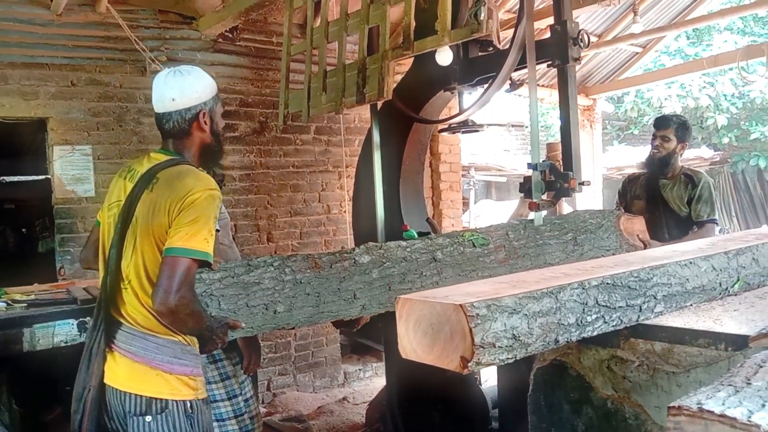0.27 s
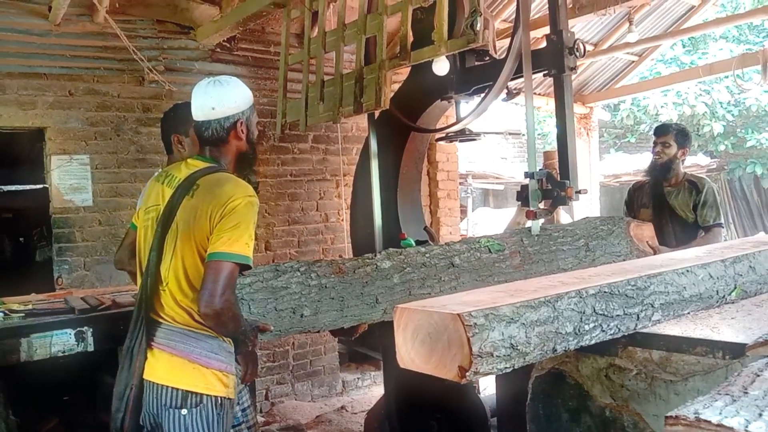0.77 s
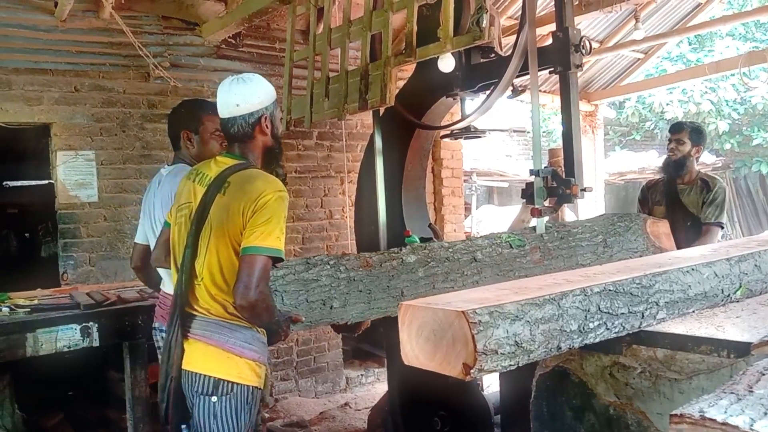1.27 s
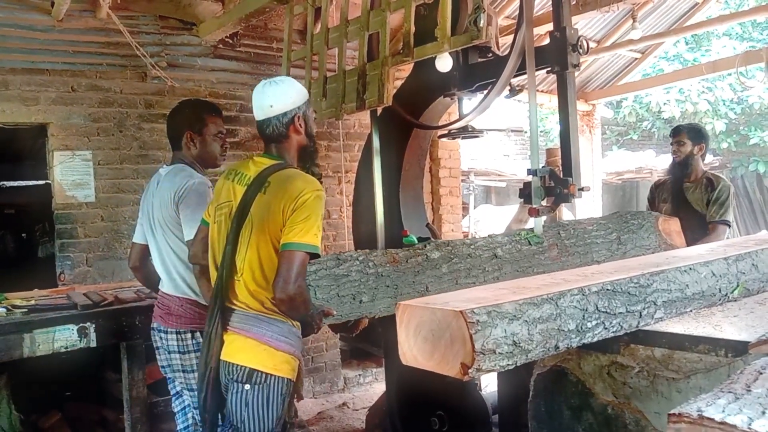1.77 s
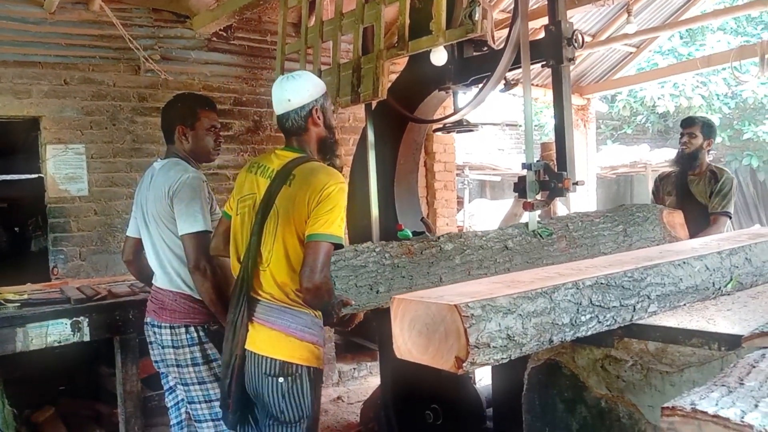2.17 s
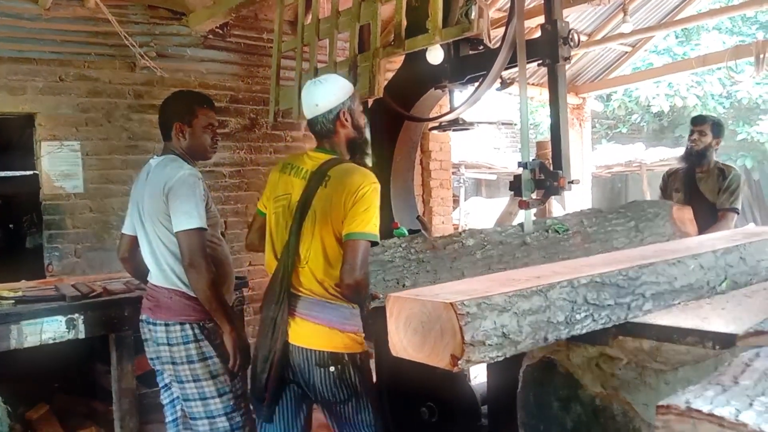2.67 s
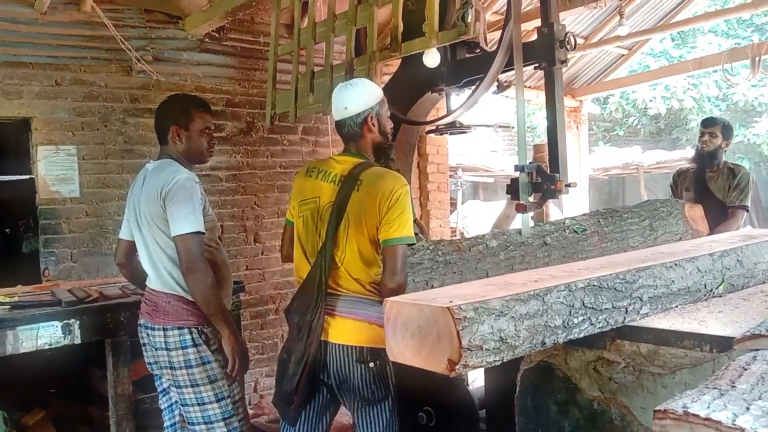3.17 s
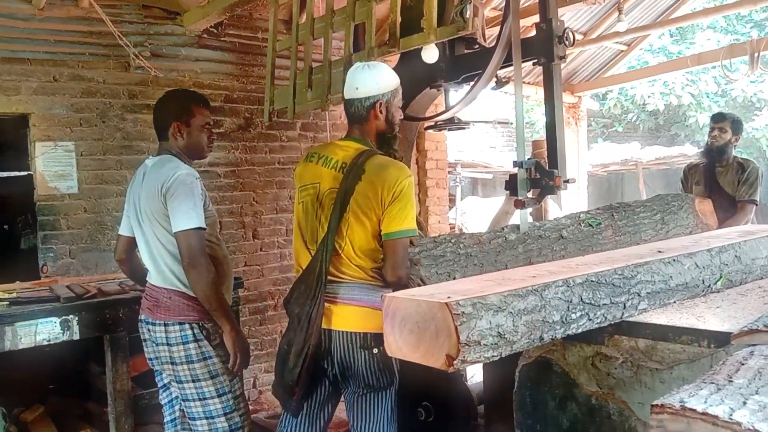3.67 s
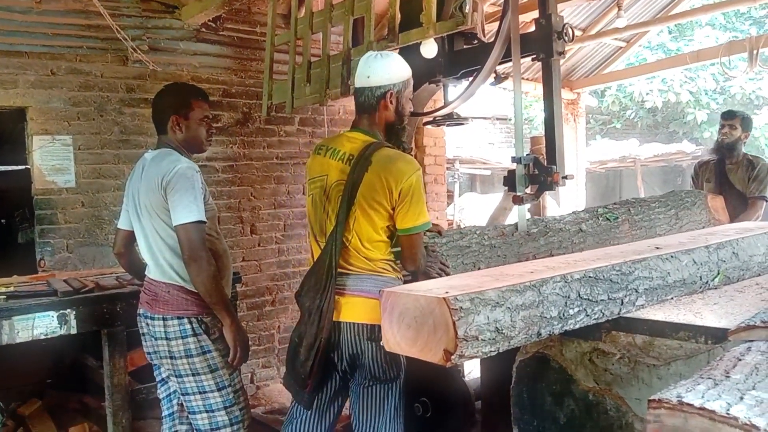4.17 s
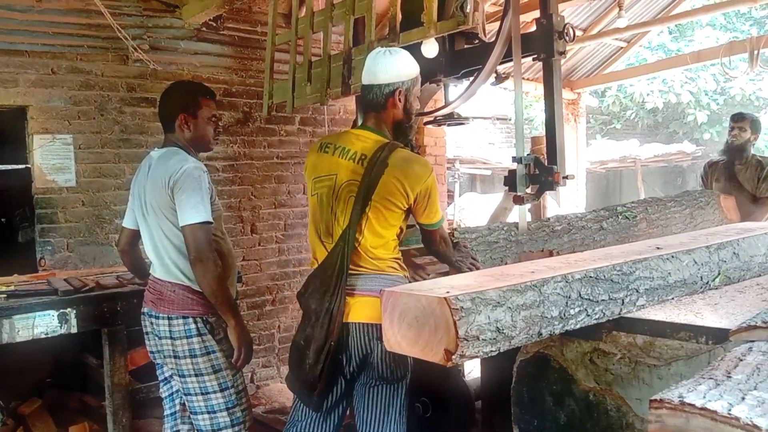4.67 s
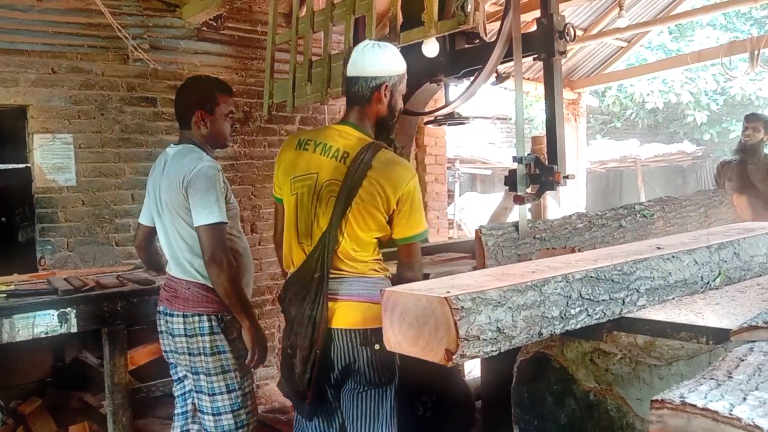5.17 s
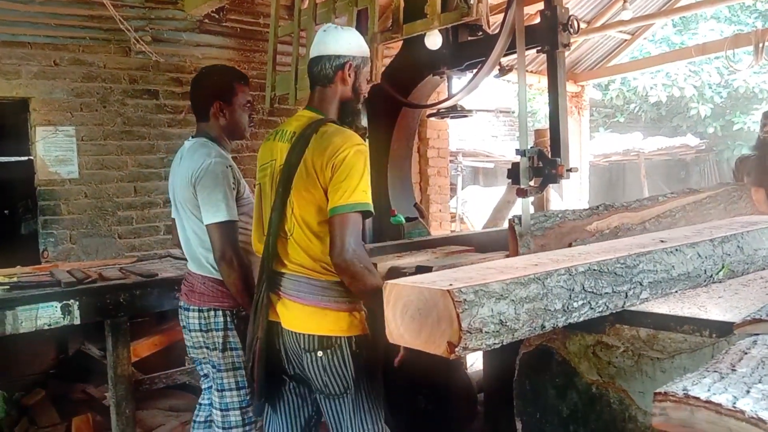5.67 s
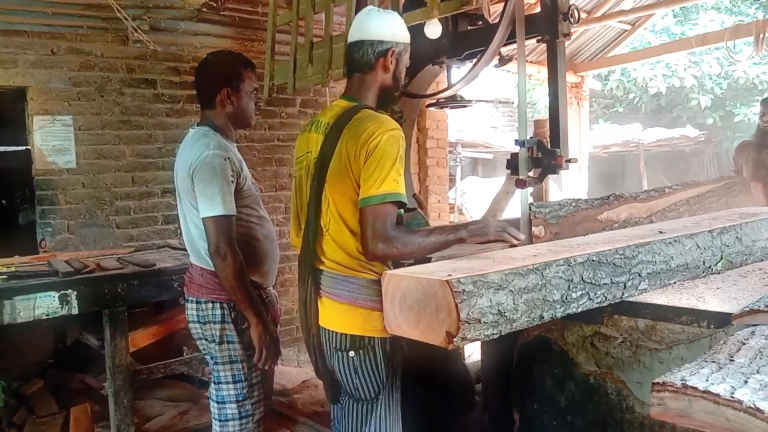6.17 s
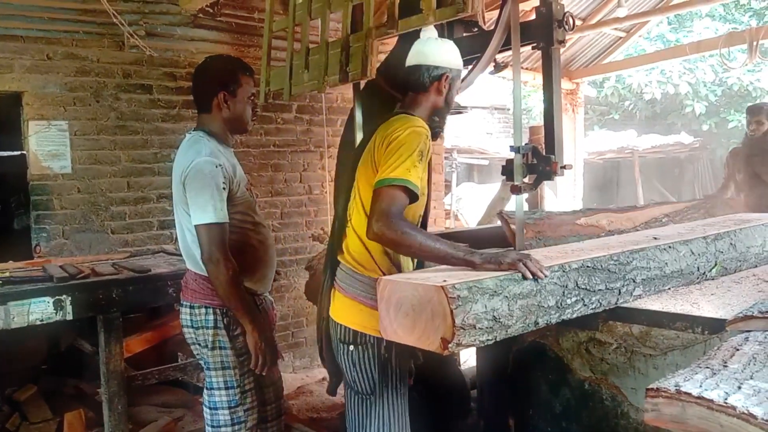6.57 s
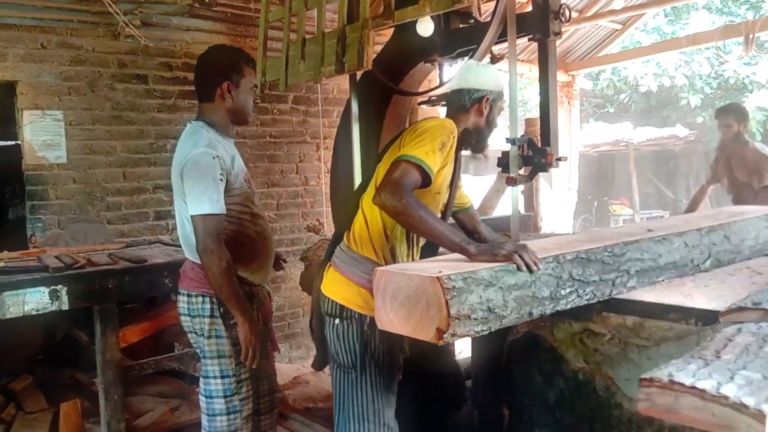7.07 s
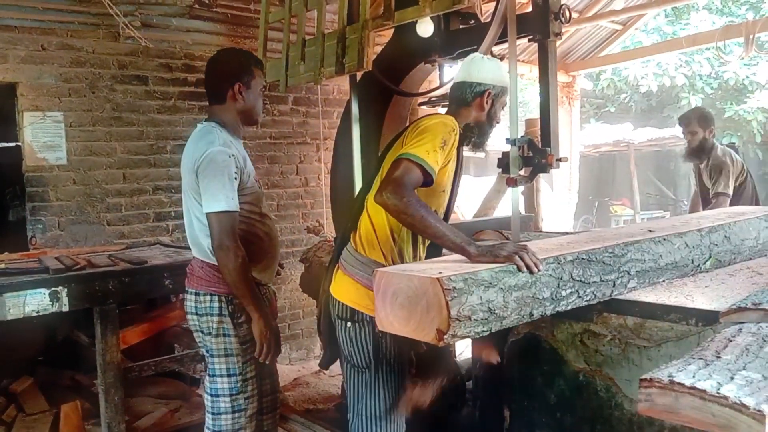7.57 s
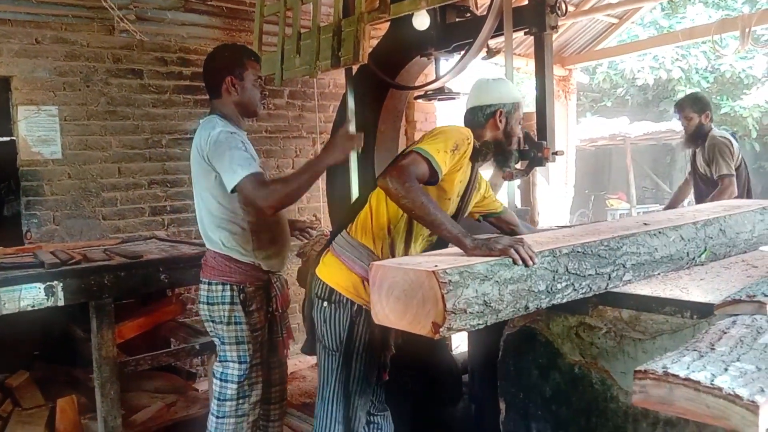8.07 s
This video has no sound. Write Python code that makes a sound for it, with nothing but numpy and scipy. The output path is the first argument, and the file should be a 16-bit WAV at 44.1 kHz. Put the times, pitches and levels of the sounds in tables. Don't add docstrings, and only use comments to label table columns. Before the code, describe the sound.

From the first instant a large band saw is at full noise, ripping a log a few metres from a phone microphone in an open brick shed with a tin roof. The sound is a dense, rough scream, strongest around 2 to 2.5 kHz, with a bright upper ring, gritty iron frame resonance and a wide hiss of sawdust. Beneath it a belt drive hums near 100 Hz and rumbles, wavering with small dips and swells. Soft timber knocks are mostly buried, one clearer at 1.4 s. The drive gradually speeds up from about 3 s. At 5.5 s the blade leaves the wood: chip hiss thins, the freed blade rings brighter, and a faint low slab groan passes until 6.5 s. The saw runs on, its hum surging near 7.5 s. Wood knocks around 7.6 to 7.7 s, then a loud sharp clack at 8.2 s; the noise continues to the end.

```python
import sys
import numpy as np
from scipy import signal
from scipy.fft import rfft, irfft
from scipy.io import wavfile
from scipy.ndimage import uniform_filter1d

SR = 44100
rng = np.random.default_rng(int(sys.argv[2]) if len(sys.argv) > 2 else 0)


def elevation(decibels):
    levels = np.asarray(decibels, float)
    return 10 ** (levels / 20)


def store_wav(level_fs):
    pcm = np.round(np.clip(np.atleast_2d(level_fs), -1, 1) * 32767)
    wavfile.write(sys.argv[1], SR, pcm.T.astype(np.int16))


N = 366471

# middle in seconds, low edge in Hz, high
# edge in Hz, level in dB.
SIDE_BURSTS = [(.995, 8200, 10500, -39), (1.785, 12400, 14600, -42), (2.18, 11670, 13300, -43),
               (3.109, 5200, 7000, -27), (3.967, 12560, 14030, -49), (7.032, 5170, 6400, -27),
               (7.032, 12400, 14100, -48), (7.357, 6220, 7550, -30), (7.357, 11600, 13330, -45)]

# time in seconds, firing rate in Hz.
FIRING_RATE = [(0.0, 97.5), (1.2, 99.4), (1.7, 97.5), (2.7, 100.7), (3.6, 102.3), (4.3, 105.7),
               (5.5, 109.1), (6.6, 111.6), (7.6, 110.6), (8.31, 111.4)]
# multiple of the firing rate, level in dB.
WEAK_ORDERS = [(28.7, -47), (33.2, -56)]
# time in seconds, change in dB, length in seconds.
LOW_SWELLS = [(.3, -1, .08), (0.499, 5, .12), (.65, -9, .08), (.77, 4, .08), (1.0, 4, .06), (1.28, -5, .1),
              (1.44, 3, .07), (1.55, -6, 0.058), (1.94, -9, .07), (2.12, -1, .06), (2.25, -1, .08),
              (2.607, -12, 0.1), (2.971, -12, 0.12), (3.35, 2, 0.063), (3.52, -5, .07), (3.9, -9, 0.13),
              (4.09, 1, 0.047), (4.39, -17, .08), (4.71, -8, .07), (4.96, -5, 0.065), (5.117, -8, .08),
              (5.52, -6, .08), (5.761, -7, .05), (5.9, 7, .07), (6.2, -4, .1), (6.72, -3, 0.11),
              (6.946, -9, .05), (7.11, -7, .06), (2.7, 4, .05), (7.71, -5, .06)]
# pitch in Hz, width in Hz, level in dB.
HOUSING_MODES = [(132, 37, -3), (258, 61, -3.5)]
# pitch in Hz, level in dB.
HOUSING_BED = [(20, -28), (50, -16), (90, -2), (130, 1.5), (280, 0), (350, -6.5), (450, -2.5), (600, -52)]

# start in seconds, peak in dB, pitch in Hz, 60 dB decay in seconds.
TIMBER_KNOCKS = [(1.4, -23, 1280, 0.16), (1.424, -33, 258, .15), (.47, -37, 105, .12), (.99, -35, 120, .12),
                 (2.68, -36, 127.4, 0.14), (3.09, -41, 150.6, .1), (3.37, -33, 387, .1),
                 (4.291, -31, 316, 0.12), (5.892, -30, 333, .2), (6.982, -32, 347.5, 0.11),
                 (7.615, -22, 953, 0.055), (7.729, -18, 1280, 0.096), (7.732, -19, 1090, .05),
                 (7.733, -18, 766, 0.056), (8.217, -5, 2210, .045)]
# time in seconds, pitch in Hz, level in dB.
SLAB_GROAN = [
    (5.55, 243, -65),
    (5.75, 245, -49),
    (6.25, 246, -47),
    (6.5, 240, -60),
]

# time in seconds, grip in dB.
WOOD_GRIP = [(0.0, -1), (.2, 0.6), (.95, -0.2), (1.9, 0.9), (2.1, 1), (2.95, 1.5), (3.1, 0.9), (3.7, 2.5),
             (3.95, 1), (4.45, -0.5), (5.35, 0), (5.6, -1.3), (6.25, -1.7), (7.05, -1.3), (7.75, -2.3),
             (7.95, -1.5), (8.2, -1.4), (8.31, -.5)]
# pitch in Hz, width in Hz, level in dB.
BLADE_MODES = [(1566, 20, -19), (1677, 192, -14.5), (1787, 210, -10.8), (1913, 36, -9.5), (1987, 77, -12.8),
               (2111, 40, -5), (2158, 89, -1.9), (2228, 119, -.5), (2342, 84, 0), (2431, 40, -8.5),
               (2469, 32, -4), (2464, 322, -11.4), (2689, 176, -12.3), (2785, 24, -15), (2920, 211, -15.1),
               (3075, 50, -14.8), (3141, 69, -16.5), (3203, 58, -15), (3262, 28, -16), (3380, 80, -16.1),
               (3447, 61, -14.7), (3516, 73, -15.6), (3592, 42, -13), (3670, 34, -13), (3752, 248, -14.9),
               (3914, 117, -17.6), (4068, 260, -17.2), (4221, 50, -16.9), (4279, 146, -18.9)]
# pitch in Hz, width in Hz, level in dB.
FREE_BLADE_MODES = [(2858, 30, -13), (3203, 55, -14), (3592, 30, -15), (3670, 30, -14)]
# pitch in Hz, level in dB.
BLADE_BED_DB = [(1400, -60), (1530, -31), (2050, -45), (2500, -15), (3300, -18), (4150, -31), (4400, -19),
                (4700, -22), (5200, -50)]
# pitch in Hz, width in Hz, level in dB.
UPPER_MODES = [(4590, 100, -7), (5054, 160, -5), (5490, 110, -7), (5806, 630, -0.5), (6080, 210, -8),
               (6640, 210, -4), (6980, 610, -11.5)]
# pitch in Hz, width in Hz, level in dB.
FREE_UPPER_MODES = [(5820, 190, 1.5), (6400, 390, -8)]
# pitch in Hz, level in dB.
UPPER_BED_DB = [(3800, -60), (4400, -15.5), (5300, -9.5), (6300, -10.5), (7400, -10.5), (7800, -17.5),
                (8100, -26.5), (9000, -40)]
# pitch in Hz, width in Hz, level in dB.
FRAME_MODES = [(327, 42, -13.5), (381, 101, -9), (431, 20, -16), (488, 80, -11.5), (543, 28, -5.5),
               (602, 46, -4.4), (645, 47, -6.5), (731, 77, -7.1), (764, 49, -3.8), (808, 25, -5.2),
               (891, 119, -4.1), (951, 95, -2.1), (1014, 26, -5.7), (1102, 40, -10.5), (1225, 116, -6.5),
               (1279, 52, -2.5), (1331, 108, -7.3), (1445, 39, -9.8), (1487, 43, -10.6)]
# pitch in Hz, level in dB.
FRAME_BED_DB = [(200, -50), (290, -24), (450, -36), (700, -12), (1150, -12.3), (1400, -12), (1540, -14),
                (1700, -40)]
# pitch in Hz, width in Hz, level in dB.
DUST_MODES = [(8570, 180, -5), (11030, 400, -3), (15000, 600, -16)]
# pitch in Hz, level in dB.
DUST_BED_DB = [(7000, -40), (8000, -9), (8600, -5), (10400, -5.5), (12000, -6.5), (13000, -9.5),
               (13850, -13.5), (14550, -4.5), (15300, -4), (15470, -1)]
# pitch in Hz, width in Hz, level in dB.
CHIP_MODES = [(11020, 730, -2), (14800, 700, -5), (15100, 460, -6)]

EXIT_S = 5.48
LOADED_HZ, FREE_HZ = 98, 111
WHEEL_HZ = 2900
# (rest dB, dB per dB of grip, dB gained from loaded to free speed, unevenness dB)
BLADE_LEVEL, UPPER_LEVEL = (-19, -1, 0, 0.41), (-21.5, 0.22, 1.84, 0.25)
FRAME_LEVEL, DUST_LEVEL = (-30, -0.46, -0.4, 0.2), (-25.5, 0.43, -0.6, 0.1)
WHEEL_LEVEL = (-19.5, -0.15, 1.5, 0.4)
HUM_DB, HUM_GAIN_DB, RUMBLE_DB, RUMBLE_GAIN_DB = -47, -1, -47, 1
RUMBLE_SHARE = 1.05
RUMBLE_PER_GRIP = -0.92
SURGE_S, SURGE_DB, SURGE_LENGTH_S = 7.5, 4, .35
# (multiple, resonance Hz, width Hz, peak dB)
FIFTH, SIXTH = (5, 546, 42, -44.5), (6, 649, 40, -46)


def evened(x):
    return x / np.sqrt(np.mean(x ** 2) + 1e-20)


def along(rows):
    s, *columns = np.transpose(rows)
    return [np.interp(np.arange(N) / SR, s, c) for c in columns]


def drift(rate_hz):
    size = max(round(SR / rate_hz), 1)
    smooth = uniform_filter1d(rng.standard_normal(N), size)
    return evened(uniform_filter1d(smooth, size))


def bell(middle_s, length_s):
    return np.exp(-(2 * (np.arange(N) / SR - middle_s) / length_s) ** 2)


def body(x, modes, bed):
    hz = abs(np.fft.fftfreq(2 ** 15, 1 / SR))
    bed_hz, bed_db = np.transpose(bed)
    power = elevation(np.interp(np.log(hz + 1), np.log(bed_hz), bed_db)) ** 2
    for mode_hz, width, db in modes:
        power = power + elevation(db) ** 2 / (1 + (2 * (hz - mode_hz) / width) ** 2) ** 2
    log_gain = .5 * np.log(power + 1e-10)
    min_phase = -signal.hilbert(log_gain).imag
    taps = np.fft.ifft(np.exp(log_gain + 1j * min_phase)).real[:2 ** 13]
    return evened(signal.oaconvolve(x, taps)[:N])


def bites(per_s, spread_db, flicker_db):
    size = elevation(spread_db * np.minimum(rng.exponential(1, N), 4)) * rng.standard_normal(N)
    struck = rng.random(N) < per_s / SR
    return size * struck * elevation(flicker_db)


def wander(x, depth_db):
    z = signal.stft(x, nperseg=1024)[2]
    patches = uniform_filter1d(rng.standard_normal(z.shape), size=3, axis=0)
    for _ in range(2):
        patches = uniform_filter1d(patches, size=14, axis=1)
    shifted = z * elevation(depth_db * evened(patches))
    return evened(signal.istft(shifted, nperseg=1024)[1][:N])


def speed():
    hz, = along(FIRING_RATE)
    return hz, (hz - LOADED_HZ) / (FREE_HZ - LOADED_HZ)


def side_noise():
    side, hz = np.zeros(N), np.fft.rfftfreq(2048, 1 / SR)
    fade = signal.windows.tukey(2048, .8)
    for s, low_hz, high_hz, db in SIDE_BURSTS:
        inside = (hz > low_hz) * (hz < high_hz)
        band = irfft(rfft(rng.standard_normal(2048)) * inside)
        side[round(s * SR) - 1024:][:2048] += elevation(db) * fade * evened(band)
    return np.array([side, -side])


def shed(x, t60, wet_db):
    first = 300
    t = np.arange(first, SR // 2) / SR
    tail = np.zeros(N)
    for k in range(3):
        signs = rng.choice([-1., 1.], len(t))
        taps = signs * (rng.random(len(t)) < .05) * elevation(-60 * t / t60)
        echoes = np.r_[np.zeros(first), taps / np.linalg.norm(taps)]
        share = np.cos(2 * np.pi * (.25 * np.arange(N) / SR + k / 3)) * np.sqrt(2 / 3)
        tail += signal.oaconvolve(x * share, echoes)[:N]
    return (x + elevation(wet_db) * tail) / np.sqrt(1 + elevation(wet_db) ** 2)


def drive_levels():
    hz, rise = speed()
    grip_db, = along(WOOD_GRIP)
    swell_db = sum(db * bell(s, length) for s, db, length in LOW_SWELLS)
    hum_db = HUM_DB + HUM_GAIN_DB * rise + swell_db + SURGE_DB * bell(SURGE_S, SURGE_LENGTH_S)
    rumble_db = RUMBLE_DB + RUMBLE_GAIN_DB * rise + RUMBLE_SHARE * swell_db + RUMBLE_PER_GRIP * grip_db
    fifth_db, sixth_db = [db - 20 * np.log10(1 + (2 * (k * hz - peak_hz) / width) ** 2)
                          for k, peak_hz, width, db in (FIFTH, SIXTH)]
    return hz, hum_db, rumble_db, fifth_db, sixth_db


def drive():
    hz, hum_db, rumble_db, fifth_db, sixth_db = drive_levels()
    throb = drift(30)
    turn = 2 * np.pi * np.cumsum(hz) / SR
    tones = elevation(hum_db + 1.6 * throb) * np.sin(turn + 0.39 * drift(12))
    tones += elevation(fifth_db + 2.2 * drift(8)) * np.sin(5 * turn + .45 * drift(12))
    tones += elevation(sixth_db + 2.5 * drift(9)) * np.sin(6 * turn + 1.1 * drift(9))
    for k, db in WEAK_ORDERS:
        level = elevation(db + 4.5 * np.minimum(drift(11), 1.2))
        tones += level * np.sin(k * turn + 1.5 * drift(11))
    rumble = body(bites(1500, 0.81, 0), HOUSING_MODES, HOUSING_BED)
    return np.sqrt(2) * tones + elevation(rumble_db + 2.1 * throb + 2.0 * drift(25)) * rumble


def timber():
    groan_hz, groan_db = along(SLAB_GROAN)
    phase = 2 * np.pi * np.cumsum(groan_hz) / SR + .45 * drift(16)
    out = elevation(groan_db + 2.3 * drift(14)) * np.sqrt(2) * np.sin(phase)
    t = np.arange(SR // 4) / SR
    for s, db, hz, t60 in TIMBER_KNOCKS:
        onset = np.minimum(t / 0.0018, 1)
        knock = elevation(db - 60 * t / t60) * onset * np.sin(2 * np.pi * hz * t)
        part = out[round(s * SR):][:len(t)]
        part += knock[:len(part)]
    return out


def feed():
    grip_db, = along(WOOD_GRIP)
    rise = speed()[1]
    push = drift(5.9)
    return [rest_db + per_grip * grip_db + gain_db * rise + uneven_db * (0.9 * push + 0.68 * drift(8.4))
            for rest_db, per_grip, gain_db, uneven_db
            in (BLADE_LEVEL, UPPER_LEVEL, FRAME_LEVEL, DUST_LEVEL, WHEEL_LEVEL)]


def sawdust(grain, free):
    dust = body(bites(30000, .6, 0.35 * grain + .5 * drift(22)), DUST_MODES, DUST_BED_DB)
    flicker_db = 0.4 * grain + 1.3 * drift(33) + 1.1 * drift(14)
    chip_bed = [(7500, -49), (9000, -8), (14000, -15), (16000, -31)]  # (Hz, dB)
    chips = body(bites(18000, .7, flicker_db), CHIP_MODES, chip_bed)
    depth = np.clip(0.4 + np.arange(N) / SR / 4.8, 0, 1)
    return evened(dust + elevation(-6.5) * depth * ~free * chips)


def saw():
    blade_db, upper_db, frame_db, dust_db, wheel_db = feed()
    free = np.arange(N) > EXIT_S * SR
    grain = drift(27) + 0.3 * drift(1.7)

    teeth = wander(bites(30000, 0.54, 0.083 * grain), 0.85)
    free_blade = body(teeth, BLADE_MODES + FREE_BLADE_MODES, BLADE_BED_DB)
    blade = np.where(free, free_blade, body(teeth, BLADE_MODES, BLADE_BED_DB))
    high_pass = signal.butter(4, WHEEL_HZ, "high", fs=SR, output="sos")
    wheel = signal.sosfiltfilt(high_pass, blade)

    high = wander(bites(30000, 0.39, 0.24 * grain + 0.45 * drift(37)), 1.0)
    free_upper = body(high, UPPER_MODES + FREE_UPPER_MODES, UPPER_BED_DB)
    upper = np.where(free, free_upper, body(high, UPPER_MODES, UPPER_BED_DB))

    jolts = bites(16000, 0.55, 0.65 * grain + 0.38 * drift(9.6))
    frame = wander(body(jolts, FRAME_MODES, FRAME_BED_DB), 1.0)

    out = elevation(blade_db) * (blade - wheel) + elevation(wheel_db) * wheel
    out += elevation(upper_db) * upper + elevation(frame_db) * frame
    return out + elevation(dust_db) * sawdust(grain, free)


def scene():
    mono = drive() + timber() + shed(saw(), 0.19, -13.5)
    return np.array([mono, mono])


def band_limit(x):
    return signal.sosfilt(signal.butter(12, 16850, fs=SR, output="sos"), x)


def record(dry):
    soft = 1.6 * np.tanh(dry / 1.6)
    edge = signal.firwin(3001, 15515, window=("kaiser", 11), fs=SR)  # low-pass, Hz
    mix = signal.oaconvolve(soft + side_noise(), edge[None], "same")
    return band_limit(mix)


dry = scene()
out = record(dry)
store_wav(out)
```